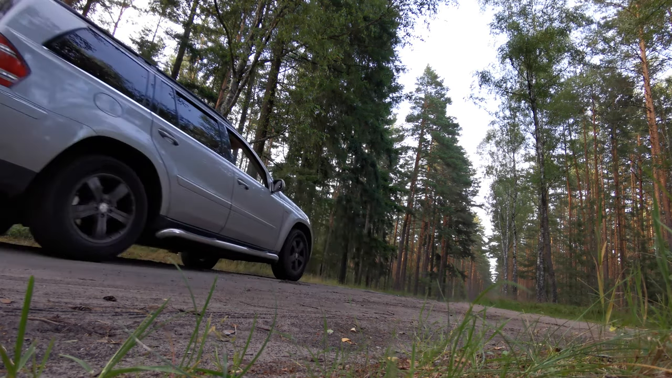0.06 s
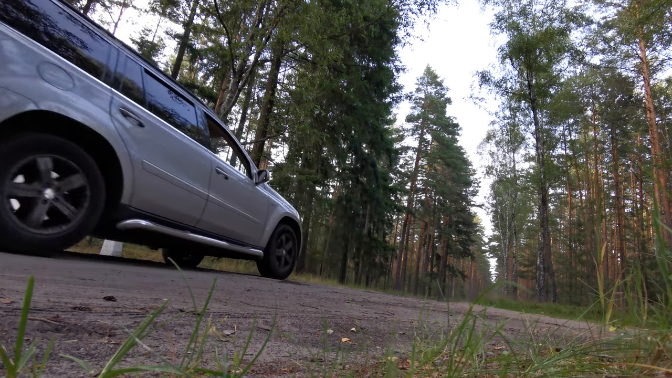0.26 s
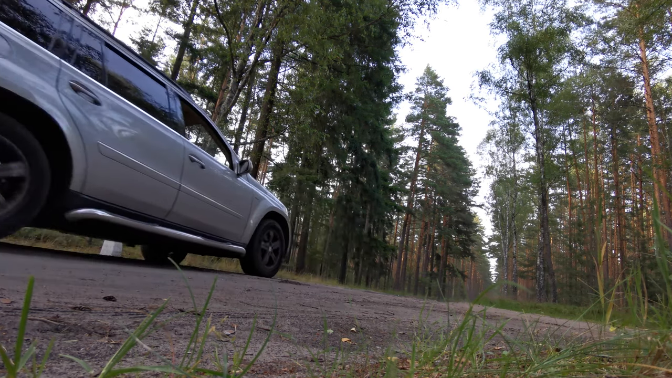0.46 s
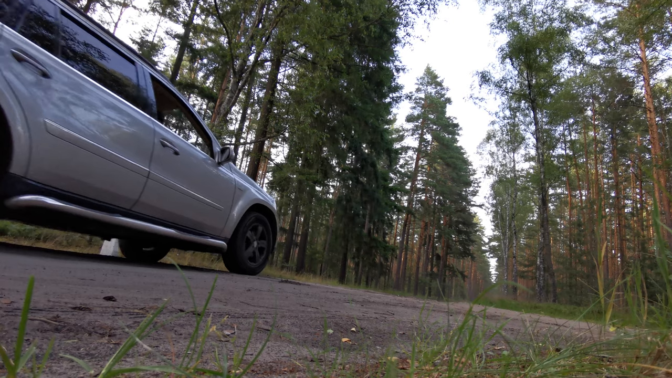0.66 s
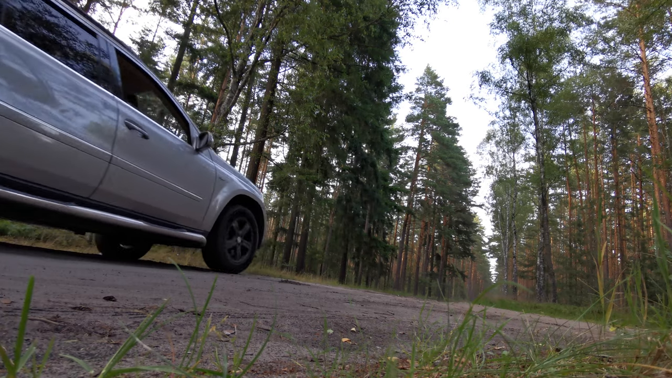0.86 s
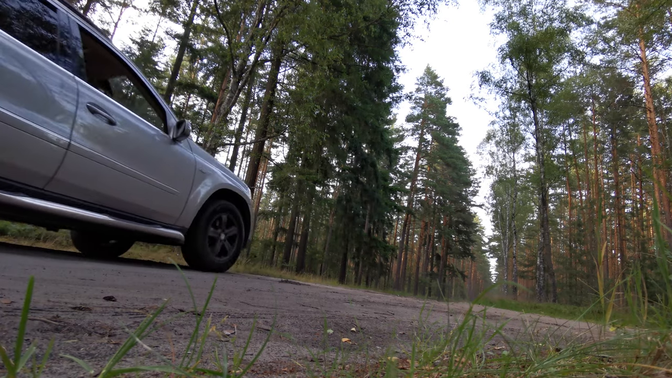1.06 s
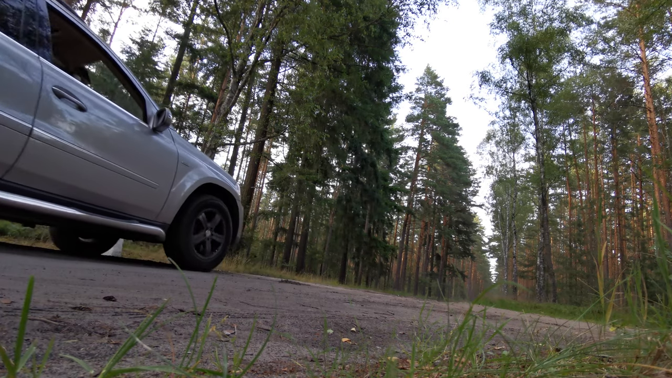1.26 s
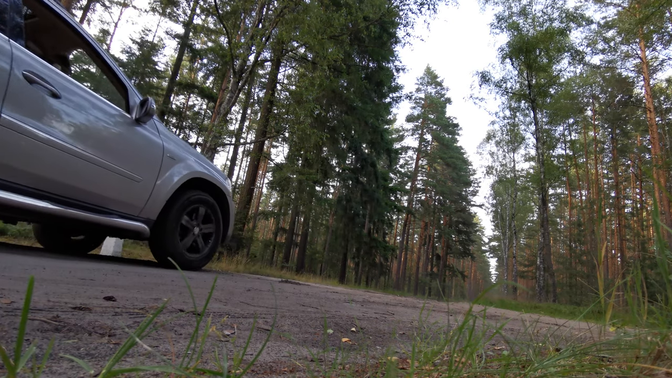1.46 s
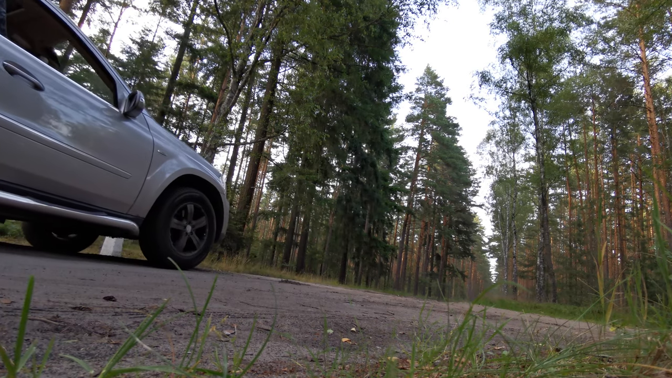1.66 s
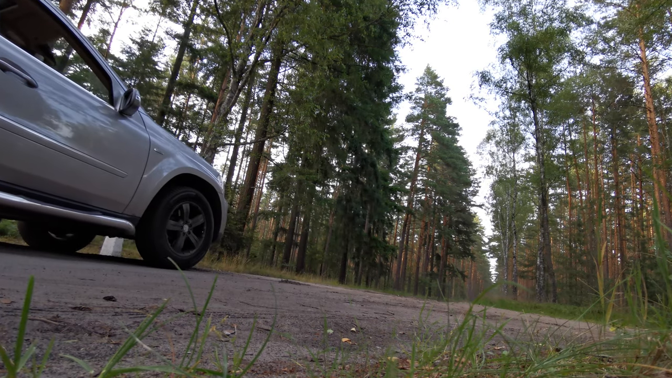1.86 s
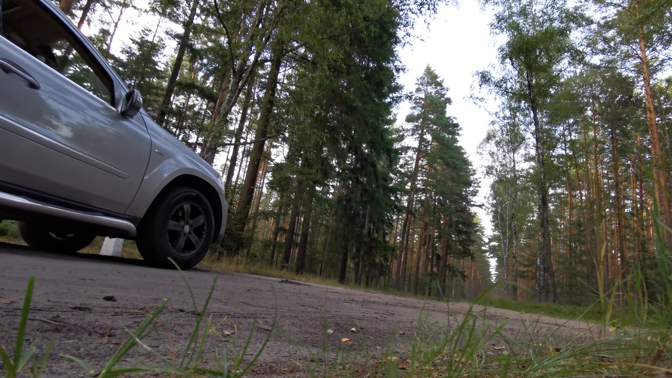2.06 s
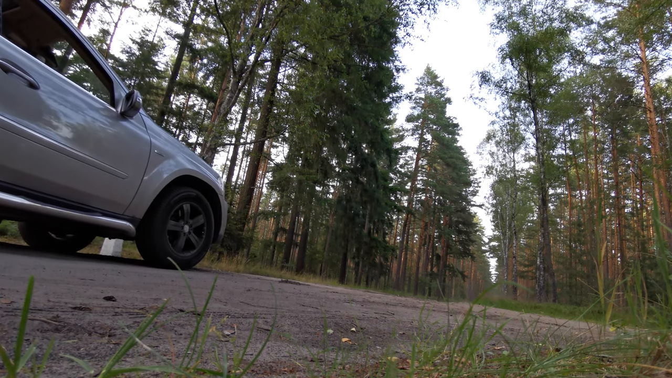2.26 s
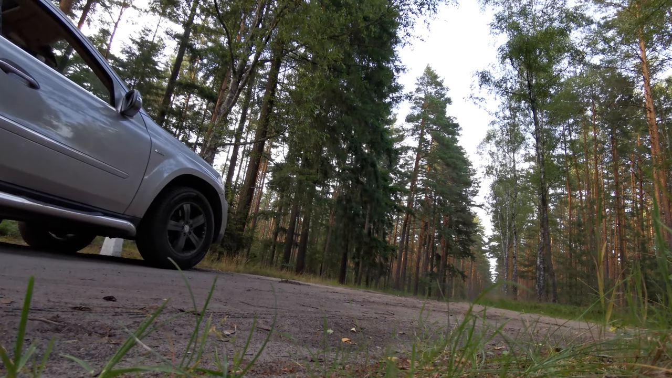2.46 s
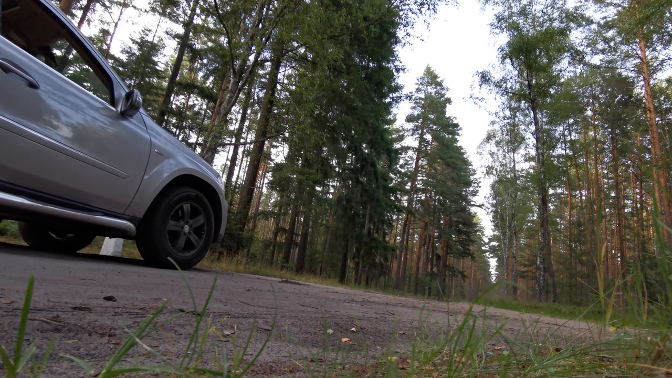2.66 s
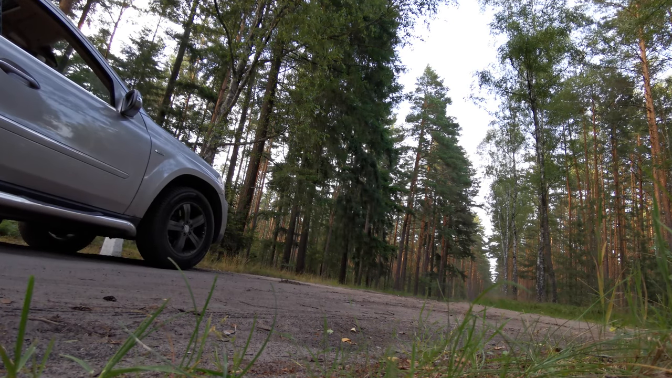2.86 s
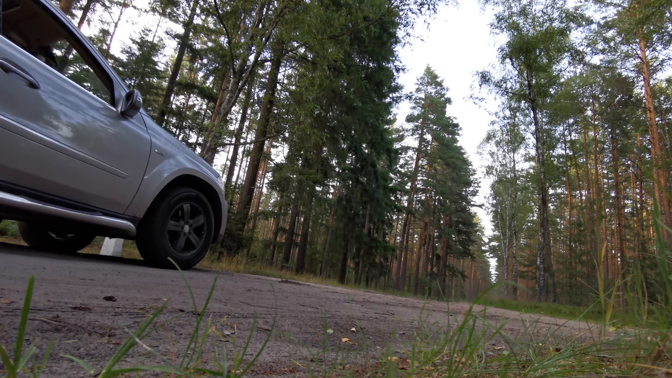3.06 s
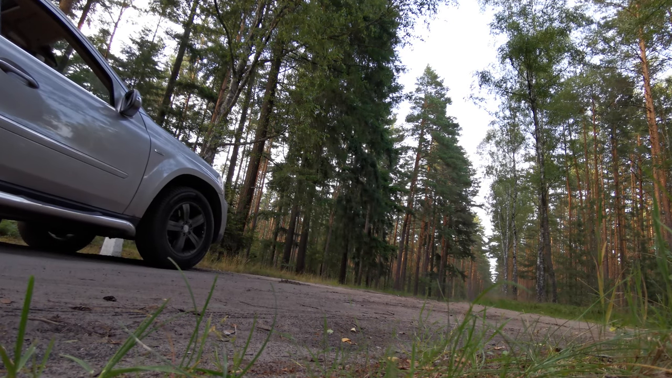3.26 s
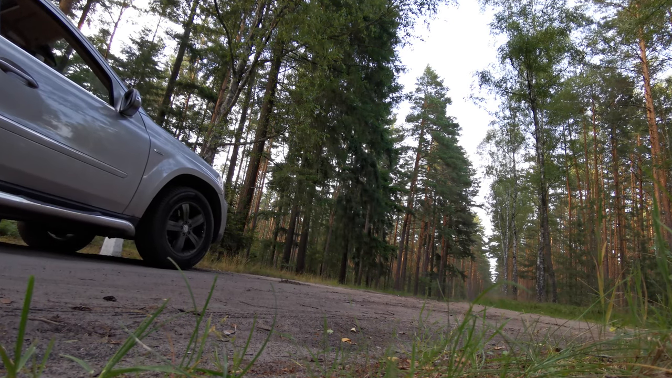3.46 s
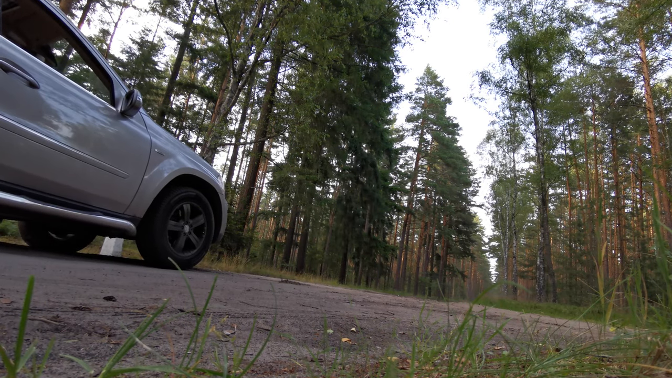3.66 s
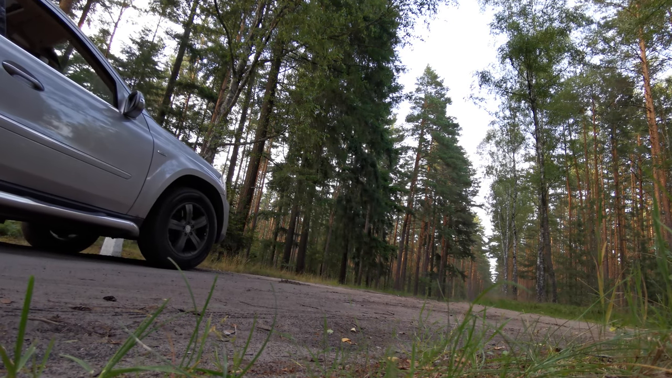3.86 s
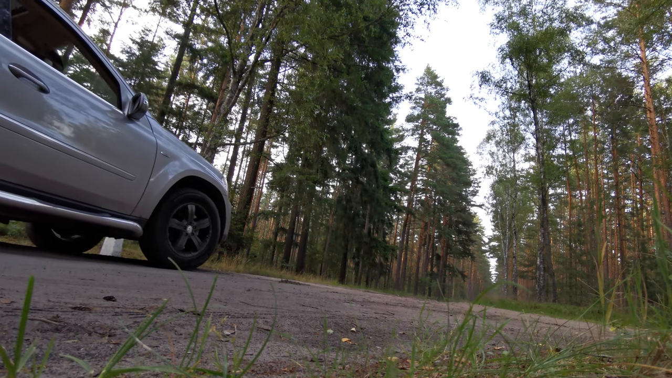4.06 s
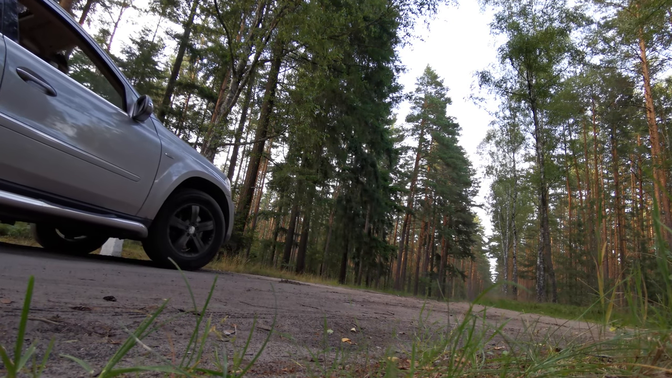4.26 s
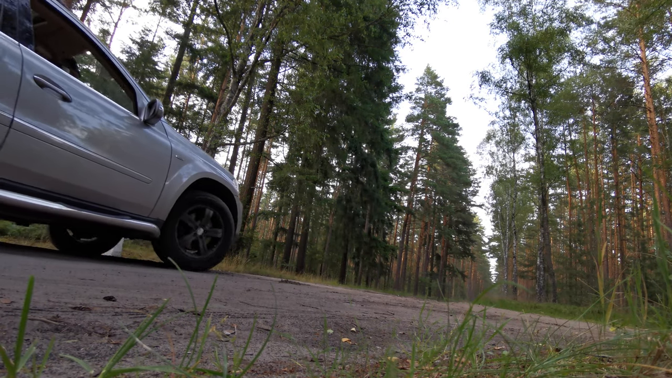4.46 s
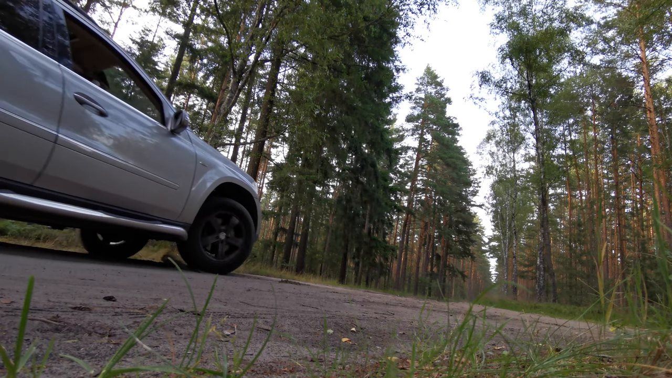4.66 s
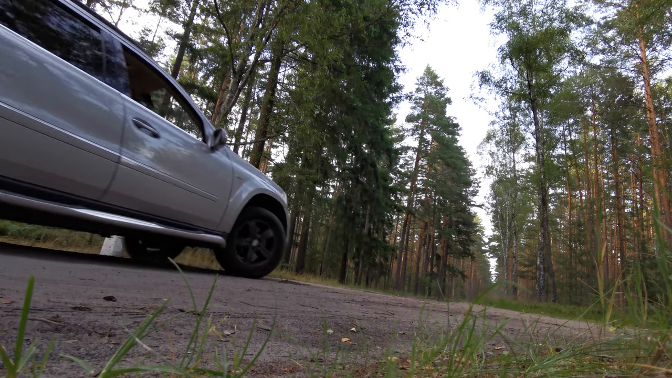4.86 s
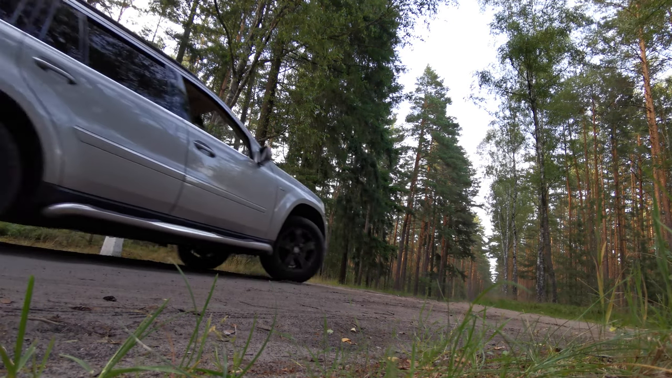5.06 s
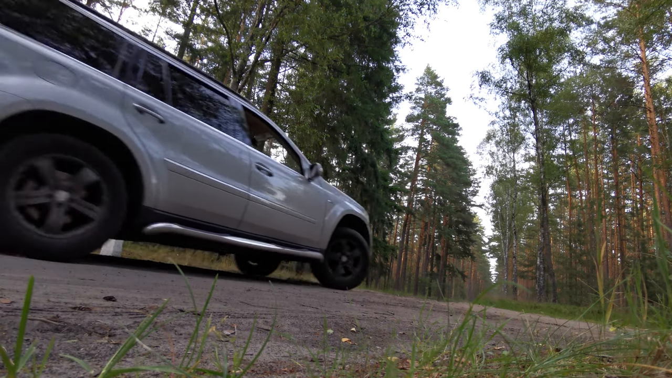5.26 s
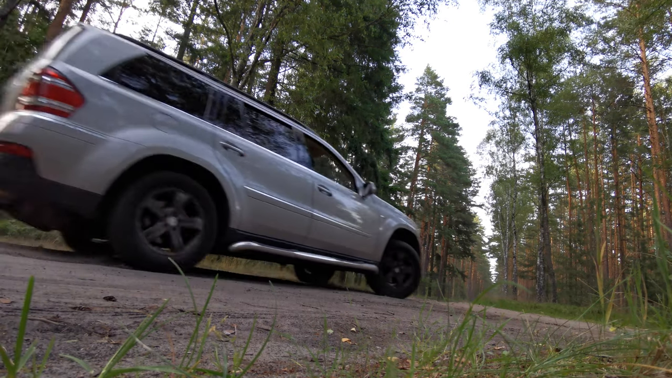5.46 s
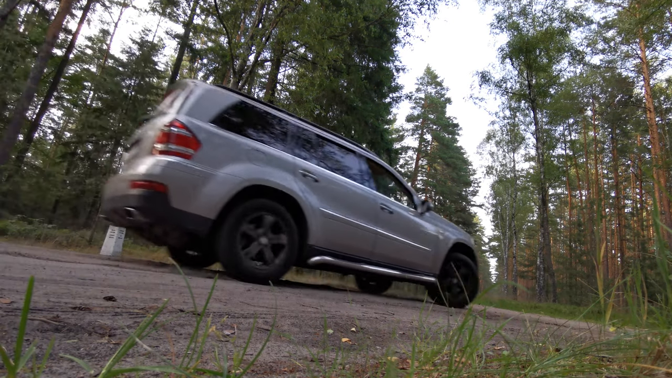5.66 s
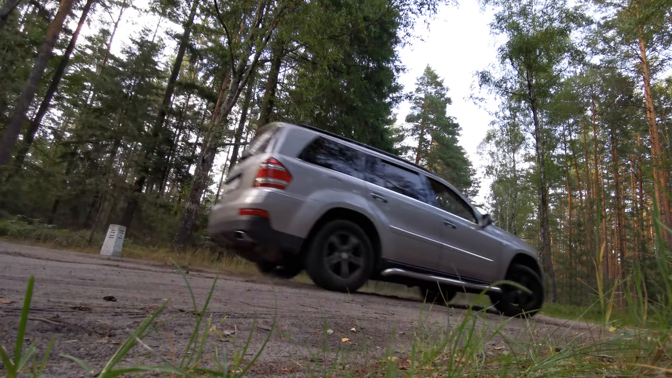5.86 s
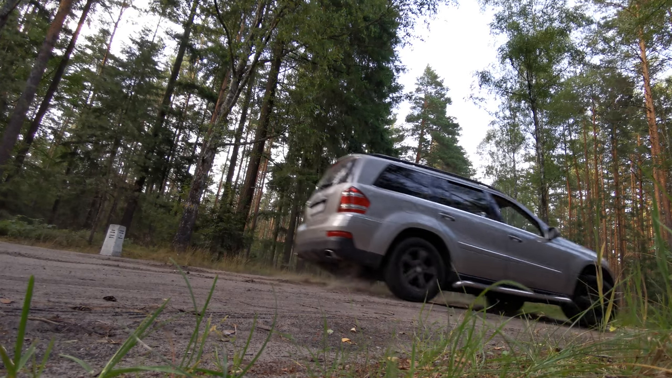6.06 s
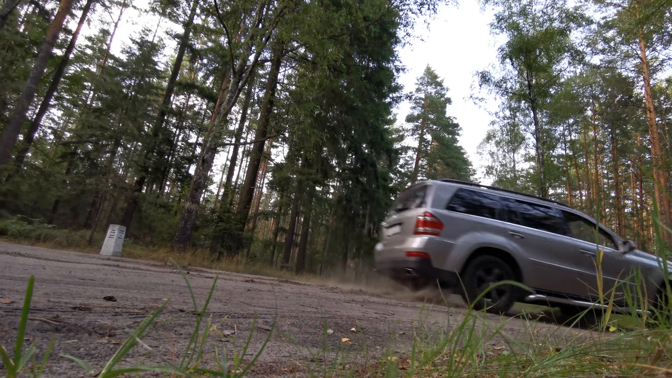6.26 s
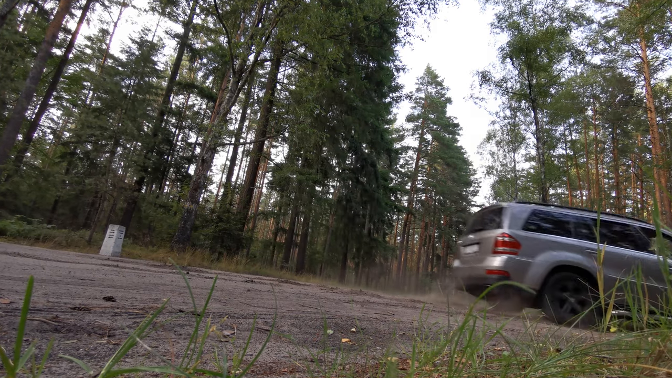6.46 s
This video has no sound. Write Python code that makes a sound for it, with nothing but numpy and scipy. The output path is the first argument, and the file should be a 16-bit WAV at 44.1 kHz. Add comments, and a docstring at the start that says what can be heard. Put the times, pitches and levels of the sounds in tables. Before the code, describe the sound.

Close by the roadside among trees, a heavy car's exhaust throbs briefly loud, then quiets while it backs up with soft knocks. The brakes chirp very high, the gearbox clunks and a brake groans. Quiet uneven V8 burbling and a thin pump whine follow. Suddenly the throttle opens, and a deep, ragged, increasingly brassy roar surges past and keeps rising, with stony tyre hiss and dull woodland reflections.

```python
"""A big V8 SUV with an open exhaust backs up on a forest road, tyres roaring faintly, and its brakes squeal.
It is put into drive with clunks and a brake groan, and burbles while the steering pump whines.
Then it pulls away hard: the exhaust barks, the intake rasps as the bonnet goes by and tyres hiss on grit.
Each engine cycle gives eight uneven blasts from two cylinder banks, which drive pipe lines and resonances.
Filtered noise makes the rush and hiss; from the start the trees send back dull echoes of the exhaust."""
import sys
import numpy as np
from scipy import signal
from scipy.io import wavfile
from scipy.ndimage import uniform_filter1d

SR = 44100
rng = np.random.default_rng(int(sys.argv[2]) if len(sys.argv) > 2 else 0)


def int16_out(signal):
    """Quantize to a 16-bit WAV file."""
    q = np.round(np.clip(np.atleast_2d(signal).T, -1, 1) * 32767)
    wavfile.write(sys.argv[1], SR, q.astype(np.int16))


N = 286657
TIME = np.arange(N) / SR  # s

# Engine speed while manoeuvring. Each row: time in seconds, four-stroke cycles per second.
IDLE_SPEED = [(0, 12.3), (.45, 10.3), (1.3, 8.85), (1.6, 7.9), (2.3, 9.35), (2.55, 9.1), (2.82, 9.85),
              (3.4, 10.1), (3.8, 9.3), (4.18, 8.9)]
# Engine speed while pulling away. Each row: time in seconds, four-stroke cycles per second.
PULL_SPEED = [(4.3, 10.65), (4.45, 13.2), (4.59, 14.9), (4.89, 17.8), (5.19, 17.1), (5.69, 20.1),
              (5.86, 21.44), (6.5, 31)]
# Presses of the accelerator. Each row: start in seconds, end in seconds, depth aimed for (1 is full pull).
PRESSES = [(1.966, 2.38, 0.4), (2.64, 3.4, 0.52), (4.196, 6.6, 1)]
PEDAL_ATTACK_S, PEDAL_RELEASE_S = 0.097, 0.35
IDLE_HZ, PULL_HZ = 9.5, 17  # reference engine speeds, cycles per second

# Cylinder banks in firing order. Each entry: 0 for the near bank, 1 for the far bank.
BANKS = np.array([0, 1, 0, 0, 1, 0, 1, 1])
# Each cylinder's blast, in firing order. Each row: level in dB, delay of its header in seconds.
CYLINDERS = [(0, 0), (-3.5, .0012), (-2.5, .0004), (0.5, -.0007), (-1.5, .0016), (-0.5, -.0003), (0, .0008),
             (0, .0019)]
# Exhaust lines. Each row: multiple of the cycle rate, then level in dB when coasting, creeping, pulling.
EXHAUST_LINES = [(2, -13, -19, -15), (3, -11, -14, -14), (4, 0, -8, -18), (5, -10, -15, -22),
                 (6, -14, -18, -3), (7, -7, -7, -18), (8, -8, -10, 0), (9, -1, -2, -11), (10, -5, -5, -3.5),
                 (11, -5, -5, -6), (12, -8, -9, -9), (13, -6, 1, -14), (14, -13, -14, -2),
                 (15, -10, -11, -12), (16, -12, -14, -10), (17, -18, -18, -7), (23, -12, -10, 1),
                 (25, -12, -10, 2), (26, -12, -10, 0), (34, -20, -20, -2)]
# Response of pipes and silencer. Each row: frequency in Hz, gain in dB.
PIPE = [(18, -16), (26, -26), (36, -6.5), (50, 0), (70, -6.5), (90, -7.5), (110, -5), (133, -2), (160, -9),
        (195, -11.5), (235, -11.5), (280, -15.5), (400, -29), (520, -28.5), (600, -31.5), (720, -46)]
# Where the tailpipes sit in the stereo picture. Each row: time in seconds, left over right in dB.
TAILPIPE_PLACE = [(0, 6), (4.9, 5), (6.1, 4), (6.5, 1)]
# Tailpipe resonances. Each row: frequency in Hz, width in Hz, level in dB.
TAILPIPE = [(343, 80, 0.5), (447, 78.5, 0.5), (508.5, 72.5, -0.5), (583.4, 61, -2), (665.4, 50, -2.5),
            (802, 60, -16.5)]
# Brassy upper resonances that open with revs. Each row: frequency in Hz, width in Hz, level in dB.
BRASS = [(778, 102, 2.5), (982, 216, 1), (1220, 240, -3.5)]
# The silencer's low ring. Each row: frequency in Hz, width in Hz, level in dB.
SILENCER = [(238, 12.7, 2), (280, 28, -7)]
# Boom: it follows the throttle, thins at high revs, and is louder at first with the tailpipes still close.
COAST_DB, CREEP_DB, PULL_DB, THIN_DB_PER_OCTAVE = -40.5, -32.5, -12.5, -2.5
CLOSE_DB, CLOSE_S = 12, 0.23
# Under load at low revs the exhaust lugs: lines near this pitch swell by up to this much.
LUG_HZ, LUG_WIDTH_HZ, LUG_DB = 48, 9.6, 14
FIRING_RISE_DB = 2.5  # most that high revs add to the line at the firing rate
PULL_ROUGH, REV_ROUGH = .33, .45  # blast turbulence at full load, and the most that high revs add

# Levels that grow with revs and leap as the car sets off. Each one lists: idle level in dB, idle slope in
# dB per octave of revs, pulling level in dB, pulling slope in dB per octave, rise time in seconds.
BARK_GROWTH = (-55, 3, -24.5, 6.5, 0.22)
# Rush growth: idle dB, idle dB per octave, pulling dB, pulling dB per octave, rise in seconds.
RUSH_GROWTH = (-58, 8, -38.5, 3.5, 0.17)
# Hiss growth: idle dB, idle dB per octave, pulling dB, pulling dB per octave, rise in seconds.
HISS_GROWTH = (-66.7, 4, -56.8, 3, 0.01)
BARK_START_S, RUSH_START_S, HISS_START_S = 4.33, 4.38, 4.41
SHADE_DB, SHADE_S = -7, 0.73  # at first the body of the car shades the hiss
OPEN_HISS_DB, GRIT_RISE_DB = 7, 5  # most that a wide throttle adds to the hiss, and high revs to the grit

# Air box resonances. Each row: frequency in Hz, width in Hz, level in dB.
AIRBOX = [(1290, 340, -4), (1690, 360, -1), (2040, 250, 0.5)]
# Intake rasp and reversing roar: start in s, hold in s, attack in dB per s, release in dB per s.
INTAKE_PASS, INTAKE_DB = (4.72, 0.15, 38, 9.9), -47
REVERSING, REVERSING_DB = (.5, .65, 12, 22), -58

# Turns of the steering wheel. Each row: start in seconds, length in seconds, whine at the start in dB.
STEERING = [(0.797, .45, -66.5), (2.38, .3, -64.5), (2.743, 1.45, -60.5)]
PUMP_ORDER = 144  # whine cycles per engine cycle
PUMP_ATTACK_DB_PER_S, PUMP_SAG_DB_PER_S, PUMP_RELEASE_DB_PER_S = 90, 5, 60
# Brake squeal and groan. Each row: start in seconds, hold in seconds, pitch in Hz, glide in Hz per second,
# level in dB, attack in dB per second, release in dB per second, angle between the channels in radians.
BRAKE_TONES = [(1.398, 0.07, 10210, -150, -36.5, 288, 458, -2),
               (2.32, .05, 648, 85, -49.5, 1200.5, 55, 1.67)]

# Knocks of brakes, drivetrain and stones under the car. Each row: time in seconds, rattle in dB,
# swell in seconds, 60 dB decay in seconds, hollow ring in dB, scuff in dB.
CLUNKS = [(0.373, -53, 0.0022, 0.039, -47.5, -77), (0.792, -55, .001, .03, -51, -74),
          (1.098, -51, 0.0011, .03, -55, -68), (2.032, -52.5, 0.016, 0.13, -47, -74),
          (2.164, -70, .004, .08, -67, -60), (2.206, -41.5, 0.014, 0.16, -39, -55.5),
          (2.317, -40.5, 0.022, 0.16, -47.5, -53), (2.81, -56, .02, 0.16, -49, -70),
          (3.640, -56, 0.0031, 0.072, -41.5, -68), (4.431, -37.5, 0.0023, 0.044, -47, -59)]
# What the chassis rings with. Each row: frequency in Hz, width in Hz, level in dB.
CHASSIS = [(490, 140, -9.5), (666, 66, 3.5), (854, 104, -1), (1140, 230, -7), (1552, 290, -8),
           (1940, 280, -11), (2950, 450, -20.5)]
# Hollow panels that ring on. Each row: frequency in Hz, width in Hz, level in dB.
PANELS = [(484, 31, -2), (578, 58, -4.5), (648, 19, 2)]

# Colour of the exhaust rumble. Each row: frequency in Hz, relative density in dB per Hz.
RUMBLE = [(20, -14), (40, -15), (90, 4), (135, -1.5), (200, 3.5), (300, -16.5), (600, -21.5)]
# Colour of the rush. Each row: frequency in Hz, relative density in dB per Hz.
RUSH = [(300, -7), (600, 3), (900, 1), (1200, -4.5), (1700, -9), (2100, -15), (2700, -44), (3600, -29),
        (6000, -60)]
# Colour of the tyre hiss. Each row: frequency in Hz, relative density in dB per Hz.
TYRES = [(1760, -31), (3000, -6), (3820, -7), (4910, -3.5), (7650, -1.5), (8550, 4.5), (9960, -4.5),
         (15100, -5.5), (15800, -11)]
# Colour of the belt hiss. Each row: frequency in Hz, relative density in dB per Hz.
BELTS = [(1760, -15), (3000, -7.5), (3380, -16), (3570, -6), (3850, -13), (4190, -9.5), (6130, -8),
         (6900, -3.5), (7550, -6.5), (9040, -2), (10100, -9.5), (15100, -16), (15800, -18)]
# Colour of scuffing friction. Each row: frequency in Hz, relative density in dB per Hz.
SCUFF = [(1500, -7), (3000, -6), (5500, 2.5), (7500, 4.5), (9000, 6), (11000, -4), (15000, -20)]
# Stereo likeness of the noises. Each row: frequency in Hz, likeness of the two channels from -1 to 1.
LIKENESS = [(60, -0.3), (300, 0.92), (600, -0.62), (1200, -0.55), (4000, 0.24), (8000, -0.1), (13000, 0)]
# Stereo lean of the noises. Each row: frequency in Hz, left over right in dB.
LEAN = [(60, 3), (250, 5), (500, -7.5), (1000, 4.5), (2000, -1), (4000, -0.5), (8000, 11), (12000, 0)]
CUTOFF_HZ = 15850


def from_db(db):
    """Decibels to gain."""
    return 10 ** (np.asarray(db) / 20)


def rms_one(x):
    """Scale to rms 1."""
    return x / np.sqrt(np.mean(x ** 2) + 1e-20)


def evened(x, size):
    """Hold the level at 1 over windows of size samples, keeping the faster throb."""
    power = uniform_filter1d(uniform_filter1d(x ** 2, size), size)
    return x / np.sqrt(power + 1e-12)


def in_time(rows):
    """One curve per column, joined by straight lines."""
    s, *columns = np.transpose(rows)
    return [np.interp(TIME, s, column) for column in columns]


def at_hz(points, hz):
    """Read a spectrum on a log-frequency axis."""
    point_hz, values = np.transpose(points)
    return np.interp(np.log(hz), np.log(point_hz), values)


def drift(rate_hz):
    """Slow random wander with spread 1, drawn once every 40 samples."""
    r = np.exp(-80 * np.pi * rate_hz / SR)
    steps = rng.standard_normal(N // 40 + 2002)
    slow = signal.lfilter([1], [1, -2 * r, r * r], steps)[2000:]  # skip the filter's settling
    return np.interp(np.arange(N) / 40, np.arange(len(slow)), rms_one(slow))


def cut(x, hz, kind, order=2):
    """Butterworth filter."""
    return signal.sosfilt(signal.butter(order, hz, kind, fs=SR, output="sos"), x)


def resonate(x, modes):
    """Parallel resonances with alternating signs."""
    out = 0
    for k, (hz, width_hz, db) in enumerate(modes):
        r = np.exp(-np.pi * width_hz / SR)
        poles = [1, -2 * r * np.cos(2 * np.pi * hz / SR), r * r]
        gain = (-1) ** k * from_db(db) * (1 - r * r) / 2
        out = out + gain * signal.lfilter([1, 0, -1], poles, x + 1e-18)
    return out


def delayed(x, seconds):
    """The same sound a little later."""
    return np.interp(TIME - seconds, TIME, x, left=0)


def panned(x, lean_db):
    """Spread over two channels, keeping their mean gain at 1."""
    gains = from_db(np.array([[.5], [-.5]]) * lean_db)
    return x * gains / gains.mean(axis=0)


def middle_rms(pair):
    """Rms of the middle of two channels."""
    return np.sqrt(np.mean(pair.mean(axis=0) ** 2))


def noise(spectrum, patchy_db, count=14):
    """Bands of stereo noise, each with its own level, flicker and likeness; rms 1 in the middle."""
    edges = np.geomspace(spectrum[0][0], min(spectrum[-1][0], .44 * SR), count + 1)
    out, white = 0, rng.standard_normal((2, 2, N))
    for k, (low, high) in enumerate(zip(edges, edges[1:])):
        mid, side = cut(white[k % 2], [low, high], "band")  # neighbouring bands share no noise
        hz = np.sqrt(low * high)
        alike = np.clip(at_hz(LIKENESS, hz), -1, 1)
        pair = np.sqrt(1 + alike) * mid + np.sqrt(1 - alike) * side * [[1], [-1]]
        level_db = at_hz(spectrum, hz) + patchy_db * drift(33.4)
        out = out + from_db(level_db) * panned(pair, at_hz(LEAN, hz))
    return out / middle_rms(out)


def envelope_db(start_s, hold_s, attack, release):
    """Attack, hold at 0 dB, release; slopes in dB per s."""
    before, after = np.maximum(start_s - TIME, 0), np.maximum(TIME - start_s - hold_s, 0)
    return -attack * before - release * after


def growth(law, start_s, cycle_hz):
    """Level in dB that follows the revs and leaps from its idle to its pulling value."""
    idle_db, idle_slope, pull_db, pull_slope, rise_s = law
    load = 1 - np.exp(-np.maximum(TIME - start_s, 0) / rise_s)
    idling = idle_db + idle_slope * np.log2(cycle_hz / IDLE_HZ)
    pulling = pull_db + pull_slope * np.log2(cycle_hz / PULL_HZ)
    return (1 - load) * idling + load * pulling


def pedal():
    """Throttle 0..1: each press builds up and dies back; the deepest one counts."""
    presses = []
    for start, end, depth in PRESSES:
        build = 1 - np.exp(-np.clip(TIME - start, 0, end - start) / PEDAL_ATTACK_S)
        presses.append(depth * build * np.exp(-np.maximum(TIME - end, 0) / PEDAL_RELEASE_S))
    return np.clip(np.max(presses, axis=0), 0, 1)


def firings(cycle, scatter_db=0.77, jitter_s=.0001):
    """One click per firing, each cylinder with its own strength and header length."""
    k = np.arange(int(cycle[-1] * len(CYLINDERS)))
    db, header_s = np.array(CYLINDERS)[k % len(CYLINDERS)].T
    chance = rng.standard_normal((len(k), 2))
    when = np.interp(k / len(CYLINDERS), cycle, TIME) + header_s + jitter_s * chance[:, 0]
    clicks = np.zeros(N)
    clicks[np.clip((when * SR).astype(int), 0, N - 1)] = from_db(db + scatter_db * chance[:, 1])
    return clicks


def puffs(clicks, puff_s=0.0027):
    """Gas flow that leaps at each firing and dies away; level 1."""
    flow = signal.lfilter([1], [1, -np.exp(-1 / (puff_s * SR))], clicks + 1e-18)
    return evened(flow, size=6000)


def boom_level_db(throttle, cycle_hz):
    """Level of the low exhaust: set by throttle and revs, raised at first by the close tailpipes."""
    load_db = np.interp(throttle, [0, .5, 1], [COAST_DB, CREEP_DB, PULL_DB])
    thinning_db = THIN_DB_PER_OCTAVE * np.maximum(np.log2(cycle_hz / PULL_HZ), 0)
    return load_db + thinning_db + CLOSE_DB * np.exp(-(TIME / CLOSE_S) ** 2)


def boom(cycle, cycle_hz, throttle, revving, idle_waver_db=5.0, pull_waver_db=1.7, coast_tilt_db=-1.5,
         snarl_db=26):
    """Low lines of the exhaust: the uneven firing of the banks sets their timing, the pipes colour them."""
    blasts = from_db(-5 * BANKS)  # the far bank is weaker and fires a touch late
    places = np.arange(len(BANKS)) / len(BANKS) + .04 * BANKS
    waver_db = idle_waver_db + (pull_waver_db - idle_waver_db) * throttle
    coasting = np.clip(1 - 2 * throttle, 0, 1)
    lugging = np.clip(5 * throttle - 2.8, 0, 1) * np.clip((PULL_HZ - cycle_hz) / 5, 0, 1)
    out = 0
    for order, *levels_db in EXHAUST_LINES:
        hz = order * cycle_hz
        timing = np.angle(np.sum(blasts * np.exp(-2j * np.pi * order * places)))
        # lines are held back as they pass the pipe's main resonance
        held = 2 * np.arctan((hz - 133) / 80)
        # at high revs the lines around one and a half times the firing rate snarl
        snarl = np.exp(-(order - 13) ** 2 / .6) * np.clip(2 * revving ** 2 - .35, 0, 1)
        # a closed throttle softens the blasts
        edge_db = coast_tilt_db * coasting * np.log2(order) + snarl_db * snarl
        firing_db = FIRING_RISE_DB * revving * (order == len(BANKS))
        lug_db = LUG_DB * lugging * np.exp(-((hz - LUG_HZ) / LUG_WIDTH_HZ) ** 2)
        db = np.interp(throttle, [0, .5, 1], levels_db) + at_hz(PIPE, hz)
        db = db + edge_db + firing_db + lug_db + waver_db * drift(6.1)
        wobble = .08 * drift(5)
        out = out + from_db(db) * np.cos(2 * np.pi * order * cycle + timing - held + wobble)
    return evened(out, size=6000)


def silencer_ring(clicks, throttle, rolling, ring_db=-16):
    """Firings ring the silencer: it comes up with the throttle but fades out under full pull."""
    return from_db(ring_db) * (1 - rolling) * (0.27 + throttle) * evened(resonate(clicks, SILENCER), size=6000)


def bark(clicks, puff, throttle, revving, idle_rough=2.4, brass_db=-22, brass_rise_db=16, low_hz=270):
    """Blasts and turbulence ring the tailpipes; load clears the tone, high revs make it brassy and ragged."""
    rough = idle_rough + (PULL_ROUGH - idle_rough) * throttle + REV_ROUGH * revving
    drive = evened(clicks, size=6000) + rough * puff * rng.standard_normal(N)
    brass = from_db(brass_db + brass_rise_db * revving) * resonate(drive, BRASS)
    rings = resonate(drive, TAILPIPE) + brass
    return evened(cut(cut(rings, low_hz, "high", order=4), 1300, "low", order=4), size=5000)


def exhaust_stereo(low, mid, bark_lean_db=0.0, bark_lag_s=0.00019, boom_lag_s=0.00028):
    """Boom and bark placed in stereo: the sound reaches the left channel first."""
    (lean_db,) = in_time(TAILPIPE_PLACE)
    low_pair = panned(np.array([low, delayed(low, boom_lag_s)]), lean_db)
    return low_pair + panned(np.array([mid, delayed(mid, bark_lag_s)]), bark_lean_db)


def rumble(low_db, throttle, idle_rumble_db=-12, pull_rumble_db=-23):
    """Low noise that follows the boom, sitting further below it as the throttle opens."""
    below_db = idle_rumble_db + (pull_rumble_db - idle_rumble_db) * throttle
    return from_db(low_db + below_db) * noise(RUMBLE, patchy_db=3.5, count=8)


def rush(cycle_hz, puff, throb=0.12):
    """Mid noise that grows with revs and throbs with the firings, joined by the tyre roar of reversing."""
    engine = from_db(growth(RUSH_GROWTH, RUSH_START_S, cycle_hz))
    reversing = from_db(REVERSING_DB + envelope_db(*REVERSING))
    throbbing = 1 - throb + throb * puff
    return np.hypot(engine, reversing) * throbbing * noise(RUSH, patchy_db=1.87, count=10)


def intake(puff, throb=.5):
    """The cylinders gulp air in pulses that ring the air box."""
    gulps = (1 - throb + throb * puff) * rng.standard_normal((2, N))
    mid, side = rms_one(cut(resonate(gulps, AIRBOX), 2400, "low", order=4))
    return from_db(INTAKE_DB + envelope_db(*INTAKE_PASS)) * (mid + side * [[1], [-1]])


def grit(per_s=700, spread_db=1.5, low_hz=3800):
    """Small stones crackle under the tread, in each channel on their own."""
    signs = rng.choice([-1, 1], (2, N))
    sizes = from_db(spread_db * np.minimum(rng.exponential(1, (2, N)), 5)) * signs
    hits = sizes * (rng.random((2, N)) < per_s / SR)
    return rms_one(cut(cut(hits + 1e-18, low_hz, "high"), 10400, "low"))


def hiss(cycle_hz, throttle, rolling, revving, puff, throb=0.19, grit_db=-10):
    """Belts hiss at idle; tyre noise takes over as the car pulls away, with grit crackling on top."""
    air_db = growth(HISS_GROWTH, HISS_START_S, cycle_hz) + OPEN_HISS_DB * throttle ** 3
    air_db = air_db + SHADE_DB * np.exp(-(TIME / SHADE_S) ** 2)
    belts = np.sqrt(1 - rolling) * noise(BELTS, patchy_db=0.5, count=26)
    tyres = np.sqrt(rolling) * noise(TYRES, patchy_db=2.0, count=10)
    air = (1 - throb + throb * puff) * (belts + tyres)
    return from_db(air_db) * (air + from_db(grit_db + GRIT_RISE_DB * revving) * grit())


def tone(hz, db, waver_hz, flutter_db, channel_angle):
    """A slightly unsteady whistle that reaches the two channels channel_angle radians apart."""
    phase = 2 * np.pi * np.cumsum(hz + waver_hz * drift(40)) / SR
    phase = phase + channel_angle * np.array([[.5], [-.5]])
    return np.sqrt(2) * from_db(db + flutter_db * drift(19)) * np.sin(phase)


def pump(cycle_hz):
    """The belt-driven pump whines while the wheel is turned, most at the start of a turn."""
    turns_db = []
    for s, length_s, level_db in STEERING:
        sag_db = PUMP_SAG_DB_PER_S * np.maximum(TIME - s, 0)
        shape_db = envelope_db(s, length_s, PUMP_ATTACK_DB_PER_S, PUMP_RELEASE_DB_PER_S)
        turns_db.append(level_db - sag_db + shape_db)
    db = np.max(turns_db, axis=0)
    return tone(PUMP_ORDER * cycle_hz, db, waver_hz=13.05, flutter_db=1.8, channel_angle=1.0)


def brakes():
    """A pad sings on its disc: the tone builds up, holds and dies, gliding a little."""
    out = 0
    for s, hold_s, hz, glide, db, attack, release, angle in BRAKE_TONES:
        level_db = db + envelope_db(s, hold_s, attack, release)
        out = out + tone(hz + glide * (TIME - s), level_db, waver_hz=8.2, flutter_db=3.0, channel_angle=angle)
    return out


def clunks(side_share=1.0, panel_t60=0.23):
    """Parts take up their slack: friction swells, rattles the chassis and leaves the panels ringing."""
    rattle, hollow, scuff = np.zeros((3, N))
    for s, rattle_db, swell_s, t60, hollow_db, scuff_db in CLUNKS:
        swell, age = np.exp(np.minimum(TIME - s, 0) / swell_s), np.maximum(TIME - s, 0)
        rattle += swell * from_db(rattle_db - 60 * age / t60)
        scuff += swell * from_db(scuff_db - 60 * age / t60)
        hollow += swell ** 2 * from_db(hollow_db - 60 * age / panel_t60)
    mid, side = rms_one(resonate(rng.standard_normal((2, N)), CHASSIS))
    chassis = mid + side_share * side * [[1], [-1]]
    panels = evened(resonate(rng.standard_normal(N), PANELS), size=1500)
    friction = noise(SCUFF, patchy_db=2.0, count=8)
    return rattle * chassis + hollow * panels + scuff * friction


def forest(x, t60=1.0, dull_hz=1500, count=24):
    """Trunks send back many weak dull echoes, others to each side."""
    dull = cut(cut(x, dull_hz, "low"), 240, "high")
    lags = rng.uniform(.02, .4, (2, count))  # s
    return np.array([sum(from_db(-60 * lag / t60) * delayed(dull, lag) for lag in side) for side in lags])


def scene(forest_db=-22):
    """Exhaust, engine bay, tyres and chassis, heard from the roadside."""
    (cycle_hz,) = in_time([*IDLE_SPEED, *PULL_SPEED])
    cycle = .2 + np.cumsum(cycle_hz) / SR  # engine cycles run so far
    throttle = pedal()
    rolling = throttle ** 6  # near 1 only under full pull
    revving = np.clip(cycle_hz / PULL_HZ - 1, 0, 1) ** .5
    clicks = firings(cycle)
    puff = puffs(clicks)

    low_db = boom_level_db(throttle, cycle_hz)
    ring = silencer_ring(clicks, throttle, rolling)
    low = from_db(low_db) * (boom(cycle, cycle_hz, throttle, revving) + ring)
    bark_db = growth(BARK_GROWTH, BARK_START_S, cycle_hz)
    mid = from_db(bark_db) * bark(clicks, puff, throttle, revving)

    exhaust = exhaust_stereo(low, mid) + rumble(low_db, throttle)
    air = rush(cycle_hz, puff) + rolling * intake(puff) + hiss(cycle_hz, throttle, rolling, revving, puff)
    mechanics = pump(cycle_hz) + brakes() + clunks()
    return exhaust + air + mechanics + from_db(forest_db) * forest(low + mid)


def record(dry):
    """The top is cut steeply."""
    return signal.sosfilt(signal.ellip(12, .1, 90, CUTOFF_HZ, fs=SR, output="sos"), dry)


dry = scene()
out = record(dry)
int16_out(out)
```